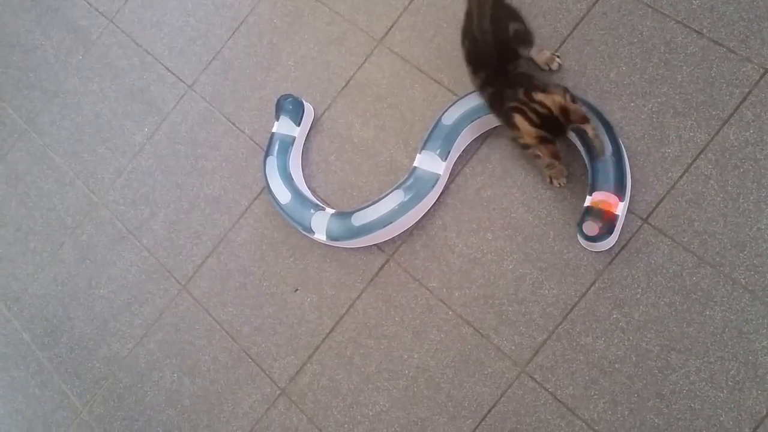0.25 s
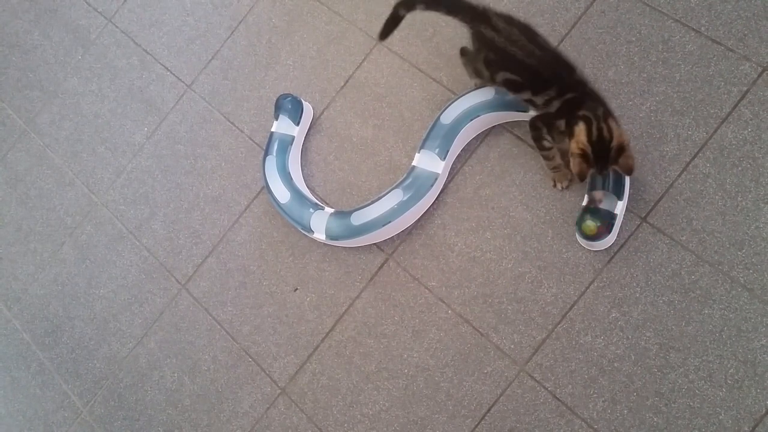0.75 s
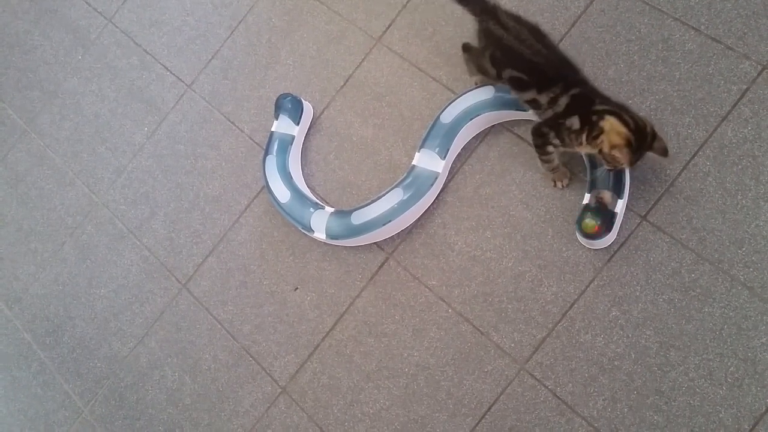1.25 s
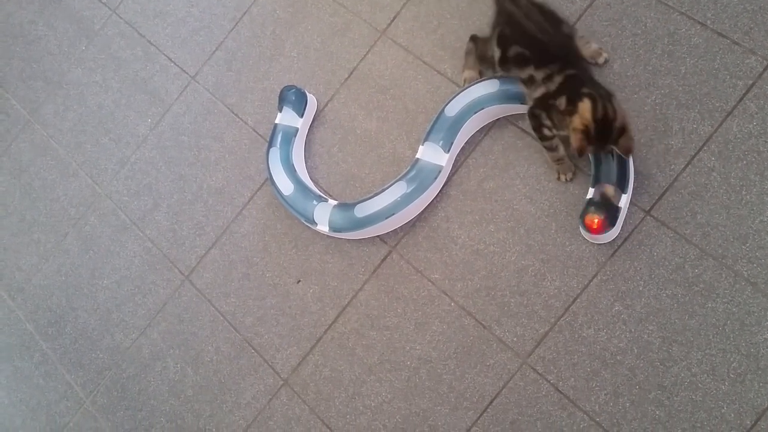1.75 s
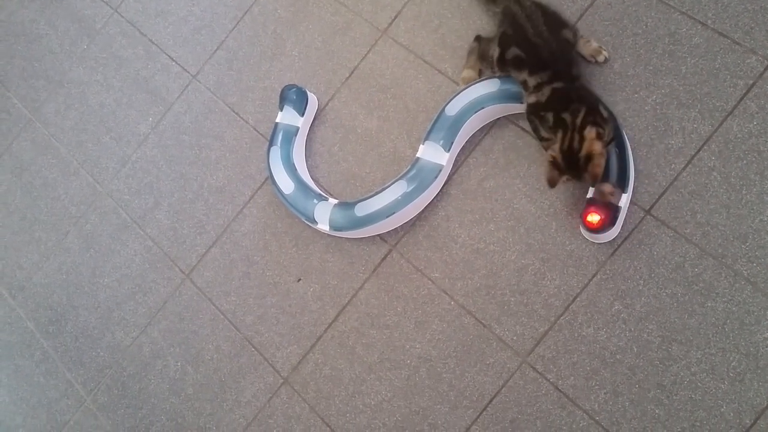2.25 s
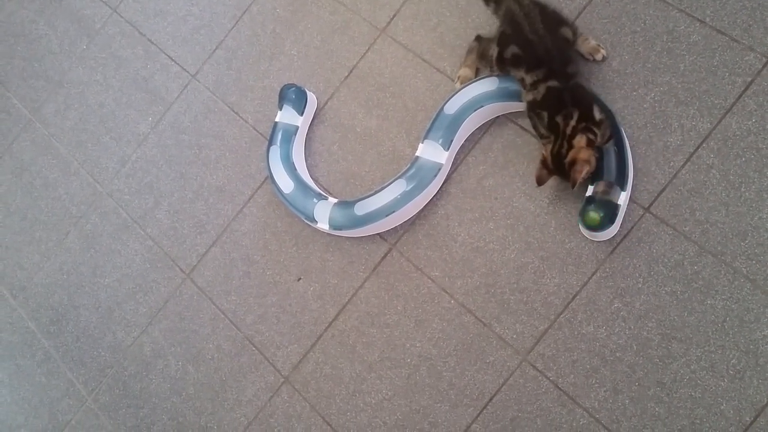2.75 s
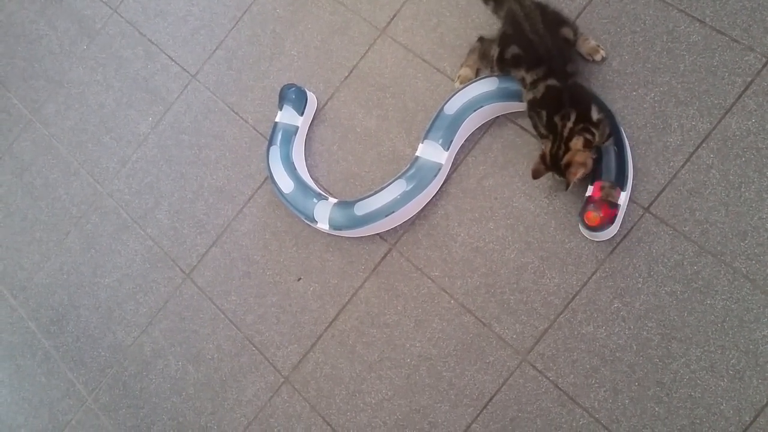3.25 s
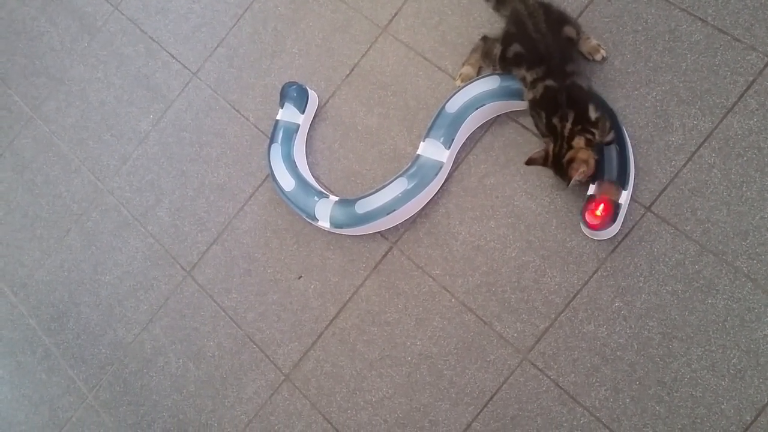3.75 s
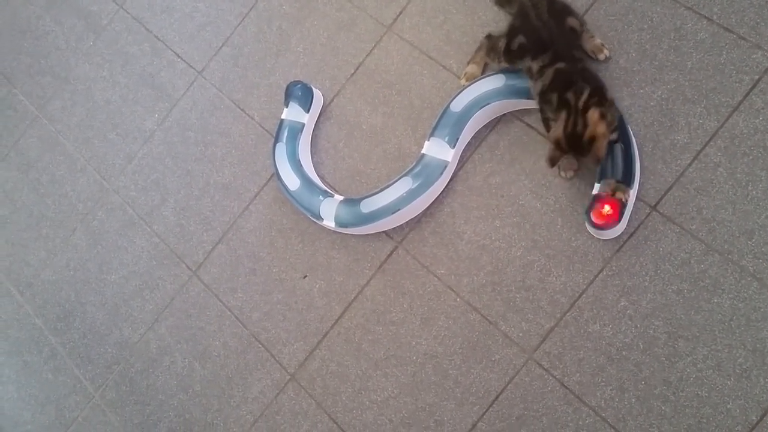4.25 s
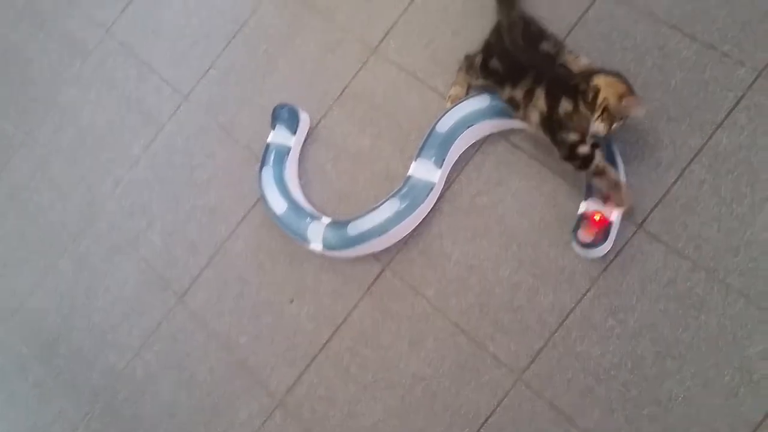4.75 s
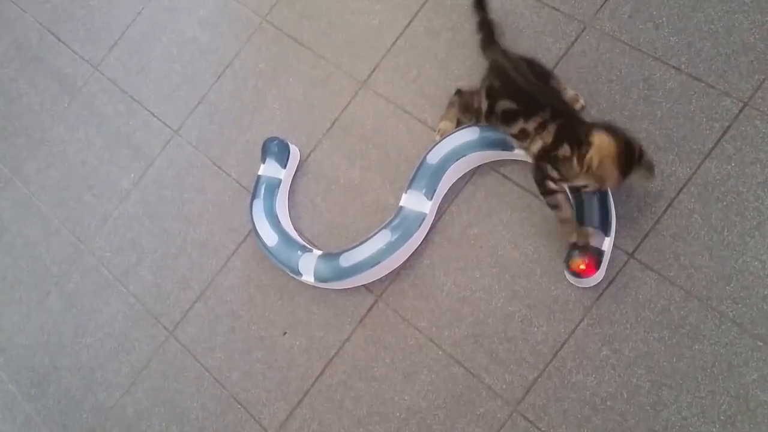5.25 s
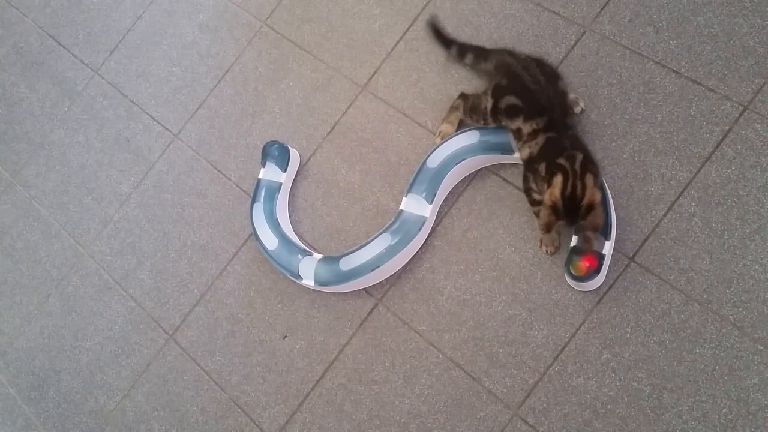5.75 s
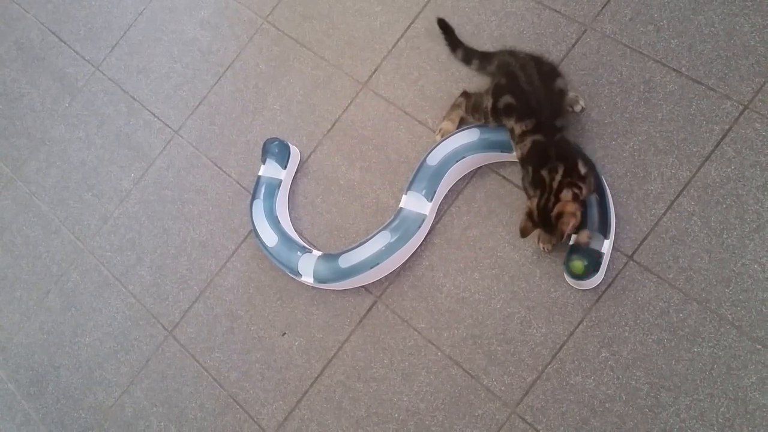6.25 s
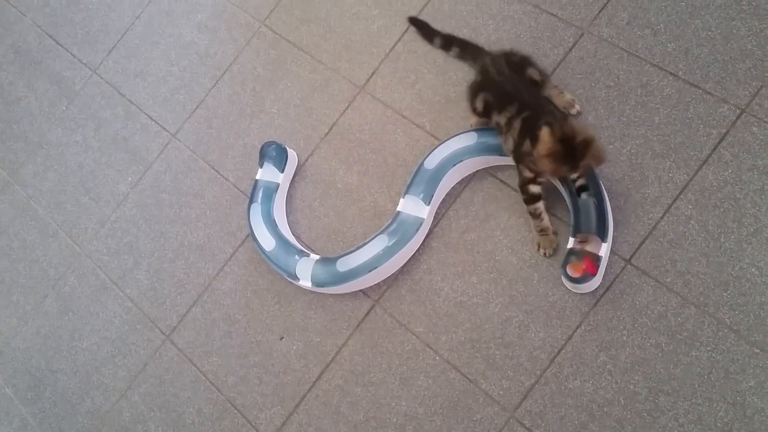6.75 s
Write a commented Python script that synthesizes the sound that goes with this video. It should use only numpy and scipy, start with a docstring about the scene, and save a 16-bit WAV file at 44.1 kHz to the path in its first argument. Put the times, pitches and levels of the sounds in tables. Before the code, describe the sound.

In a bare tiled room with a low, faint appliance hum, a light plastic ball is pawed inside a hollow plastic track, slightly right of centre. Small taps begin at 0.2 s, and sharp loud clacks land at 0.7 and 0.86 s with a flurry of rattles. Knocks and short grainy rolls continue from 1.1 to 2.2 s, with a soft low handling thump near 1.85 s. Lighter, dense rattling fills 2.4 to 3.2 s, ending with one knock at 3.35 s. In the lull, a very thin, high two-tone whistle from the kitten glides from 3.7 to 4.0 s, then a claw ticks and drags faintly on tile. Knocks return at 4.6 s, with another dull handling thump at 4.7 s. Strong clacks strike around 5.0 and 5.4 s, rattling and rolling on to 6.3 s, then sparser taps until a last pair near 6.9 s. Room echo follows each blow; background level sinks in pauses.

```python
"""A light plastic ball knocks and rolls in a hollow plastic track as a kitten paws at it on a tiled floor:
from the start blows and dense small bumps excite damped modes, the bare room rings on after them, and
filtered noise and wavering resonances give the hum of far appliances. At 1.8 s and 4.7 s a hand shifts
on the recorder, a decaying low sine; at 3.7 s the kitten gives one thin two-tone whistle; at 4.0 s a claw
taps and drags on a tile. Throughout, the hand-held stereo recorder turns its gain down in the quiet."""
import sys
import numpy as np
from scipy import signal
from scipy.fft import rfft, irfft, next_fast_len
from scipy.io import wavfile
from scipy.ndimage import uniform_filter1d

SR = 44100
rng = np.random.default_rng(int(sys.argv[2]) if len(sys.argv) > 2 else 0)


def field_ratio(decibels):
    """Amplitude ratio for a level in dB (20 dB per decade); scalars and array-likes work."""
    return 10 ** (np.asarray(decibels, dtype=float) / 20)


def to_wav(s):
    """Save 16-bit WAV."""
    ch = np.atleast_2d(s).T  # columns
    pcm = np.round(np.clip(ch, -1, 1) * 32767)  # PCM
    wavfile.write(sys.argv[1], SR, pcm.astype(np.int16))


N = 309141   # length in samples


def rms_one(x):
    """Normalisation: scale to an rms of 1."""
    return x / np.sqrt(np.mean(x ** 2) + 1e-20)


def in_time(rows):
    """Linear interpolation: the columns of a table led by t/s, sample by sample."""
    s, *columns = np.transpose(rows)
    return [np.interp(np.arange(N) / SR, s, c) for c in columns]


def at_hz(points, hz):
    """Linear interpolation on a log-frequency axis."""
    table_hz, value = np.transpose(points)
    return np.interp(np.log(hz), np.log(table_hz), value)


def drift(rate_hz):
    """Low-passed noise: a slow random fluctuation of rms 1, from two equal real poles at rate_hz."""
    hop = 40   # drawn at every 40th sample
    r = np.exp(-2 * np.pi * hop * rate_hz / SR)
    noise = rng.standard_normal(N // hop + 2002)
    slow = signal.lfilter([1], [1, -2 * r, r * r], noise)[2000:]   # the filter has settled
    return np.interp(np.arange(N) / hop, np.arange(len(slow)), rms_one(slow))


def ring(clicks, hz, t60):
    """Damped resonator: a unit click starts a sine of height 1 that falls 60 dB in t60 seconds."""
    r, w = field_ratio(-60 / (t60 * SR)), 2 * np.pi * hz / SR
    return signal.lfilter([0, np.sin(w)], [1, -2 * r * np.cos(w), r * r], clicks + 1e-18)


def bands(length):
    """Interchannel coherence: half-octave noise, mid and side mixed to left and right by their likeness."""
    # how alike left and right are: f/Hz, likeness (below 0 counts as 0)
    likeness = [(60, 1), (230, 0.75), (910, 0.52), (3550, -0.56), (13800, -0.15)]
    edges = 25 * 2 ** np.arange(0, 9.6, .5)
    white = rng.standard_normal((2, 2, length))   # neighbouring bands take different noise
    for k, (low, high) in enumerate(zip(edges, edges[1:])):
        band_pass = signal.butter(2, [low, high], "band", fs=SR, output="sos")
        mid, side = signal.sosfilt(band_pass, white[k % 2])
        hz = np.sqrt(low * high)
        alike = np.clip(at_hz(likeness, hz), 0, 1)
        yield hz, np.sqrt(1 + alike) * mid + np.sqrt(1 - alike) * side * [[1], [-1]]


def ambience(air_db=-53.5, patchy_db=-0.5):
    """Noise-driven resonance: shaped room noise, and the hum of far appliances wavering in narrow bands."""
    # spectral density of the room noise before it is scaled to air_db: f/Hz, level/dB per Hz
    air_spectrum = [(15, -35), (25, -25), (118, -9.5), (141, -15), (323, -11.5), (386, -13.5), (463, -14),
                    (600, -12), (1770, -24), (2420, -18), (2900, -29), (3470, -30), (5120, -47),
                    (8360, -84), (12000, -56), (15600, -79), (22000, -120)]
    # humming resonances: f/Hz, width/Hz, mid level/dB
    hum = [(47.6, 3.6, -62), (58.3, 12, -60.5), (95.24, 2.4, -63.5), (144, 15.5, -64.5), (195.6, 9.2, -64),
           (396.4, 10, -68), (3510, 340, -65.5)]
    air = sum(field_ratio(at_hz(air_spectrum, hz) + patchy_db * drift(16.0)) * v for hz, v in bands(length=N))
    out = field_ratio(air_db) * rms_one(air)
    for hz, width_hz, level_db in hum:
        t60 = 2.2 / width_hz   # a narrow resonance rings long
        mid = rms_one(ring(rng.standard_normal(N), hz, t60))
        side = rms_one(ring(rng.standard_normal(N), hz, t60))
        out = out + field_ratio(level_db) * (mid + 0.33 * side * np.array([[1], [-1]]))
    return out


def rolling_db(spin_up_s=0.0085, slowing_db_per_s=86):
    """Exponential decay: each roll spins up, runs on, then slows; levels of its rumble and its scuff."""
    # the ball is set rolling: start t/s, rolling on t/s, push level/dB, scuff level over the push/dB
    rolls = [(0, 0.0095, -53.5, -11), (0.211, 0.12, -55, 0), (0.397, 0.014, -57, 15),
             (0.551, 0.35, -46, -5), (.72, 0.043, -43.5, -1.5), (1.08, 0.76, -48.5, -13),
             (1.47, 0.02, -56, 5), (1.72, 0.17, -47, -8.5), (1.999, 0.077, -48.5, 1.5),
             (2.441, 0.32, -49.5, -13), (2.8, 0.27, -46.5, -6), (3.359, 0.076, -59.5, -9),
             (4.66, .15, -55.5, -18), (4.93, 0.11, -43.5, -8), (5.06, 0.027, -41, -2),
             (5.358, 0.15, -45, -8), (5.55, 0.31, -47, -0.5), (6.068, 0.062, -53.5, 3),
             (6.44, 0.19, -45.5, -13), (6.95, .1, -58.5, 3.5)]
    t = np.arange(0, N / SR + .01, .002)
    push, scuff = 1e-6, 1e-6   # floors
    for s, run_s, push_db, scuff_db in rolls:
        slowing_s = np.maximum(t - s - spin_up_s - run_s, 0)
        shape = np.clip((t - s) / spin_up_s, 0, 1) * field_ratio(-slowing_db_per_s * slowing_s)
        push = push + field_ratio(push_db) * shape
        scuff = scuff + field_ratio(push_db + scuff_db) * shape
    return in_time(np.transpose([t, 20 * np.log10(push), 20 * np.log10(scuff)]))


def small(x, hz):
    """Radiation efficiency: a small part radiates little far from its own pitch."""
    wide = 1.32   # band edges as a ratio to the pitch
    edges = [hz / wide, min(hz * wide, .45 * SR)]
    return signal.sosfilt(signal.butter(1, edges, "band", fs=SR, output="sos"), x)


def track(per_s=70.0, spread_db=2.5, wander_db=3.0, mode_spread_db=1.5):
    """Modal excitation: knocks and the dense small bumps of the rolling ball strike the same modes."""
    # blows of ball and paw: t/s, blow level/dB, then hollow, wall and hardness level over the blow/dB
    knocks = [(0.1965, -47.5, 2, -19, -36), (0.2831, -43, -31, -16, -11), (0.2945, -34, -25, -9.5, -17.5),
              (0.4403, -32, -22, -26, -9), (0.5488, -38.5, -13, 2, -5), (0.7124, -20.5, -10, -7.5, -14.5),
              (0.8001, -31, -6, -9, -3.5), (0.8637, -21, -9.5, -1.5, -7.5), (0.889, -37, -1, -8, -15),
              (0.917, -34, -7, -5, -10), (0.932, -30.5, -1.5, -15, -10), (0.957, -36.5, -10, -6, -19),
              (0.976, -41, -8, -6, -24), (1.147, -29.5, -10.5, -1.5, -13.5), (1.1783, -28.5, -5.5, 2, -6.5),
              (1.3935, -32.5, -4.5, -2.5, -18.5), (1.4264, -36, 0, -5, -21), (1.447, -29, -20, -7, -13),
              (1.6771, -35, -49, -1.5, -49), (1.6983, -39, -1, -5, -8.5), (1.765, -27.5, -25, -1.5, -21),
              (1.8054, -37, 2.5, 5, -0.5), (1.9662, -29, -3.5, 3.5, -12.5), (2.0854, -35, -5, -14, -13),
              (2.1013, -36, 0, -1, -18), (2.1256, -38.5, -9, -8, -16), (2.136, -41, 0, -8, -22),
              (2.175, -27.5, -7, -3, -9.5), (2.3962, -37.5, -17, -2, -14.5), (2.484, -38.5, -18, -2, -6.5),
              (2.6413, -38.5, -1, -2, -20), (2.665, -34, -3.5, -6.5, -25), (2.6892, -40.5, -1, -9, -16),
              (2.7733, -33, -6, -5, -17), (2.8106, -33.5, -3, -7, -30), (2.841, -39, -13, -0.5, -20),
              (2.871, -38, -4, 1.5, -12), (2.886, -41, -10, 2, -12), (2.9125, -34, -1.5, -4, -59),
              (2.998, -39.5, -2, -6, -17), (3.016, -38.5, -5, -4, -13), (3.1044, -33.5, -26, -2, -14),
              (3.1858, -36.5, -0.5, -6, -13.5), (3.3453, -30, -3.5, -5.5, -21.5),
              (4.6311, -36, -20, -13.5, -20), (4.738, -34.5, -11, -8, -20), (4.8368, -39, -24, -15, -33),
              (4.8522, -31.5, -13.5, -11.5, -26), (4.9067, -41, -2, 8, -10), (4.9271, -32, -34, 0.5, -11),
              (4.998, -41, -12, -2, -11), (5.0077, -24.5, -20, -4.5, -12), (5.0685, -22, -17, -21, -38),
              (5.1451, -31.5, -3, 1, -7), (5.3201, -27.5, -19, -4.5, -15), (5.3431, -31, -14, -13, -25),
              (5.3596, -34, -3, -13, -21), (5.4117, -26, -10, -10, -20), (5.4304, -23.5, -6.5, -3.5, -12.5),
              (5.461, -31.5, -4, -5, -13), (5.469, -37, -3, -15, -17), (5.5871, -32.5, 0, -16, -19),
              (5.6331, -31, -6, 0.5, -12), (5.654, -26.5, -3.5, -2.5, -5), (5.666, -33, -1, -5, -6.5),
              (5.692, -37, -12, -7, -5), (5.7978, -30, -5, -0.5, -14), (5.8892, -28.5, -2.5, -1, -8),
              (5.9097, -32, -3.5, -19, -7), (6.117, -31, 0, -1.5, -17), (6.1429, -28.5, -8, -9.5, -24),
              (6.2893, -26, -3, -2, -10), (6.5025, -40, -5, -19, -31), (6.5413, -40, -4, -1.5, -32),
              (6.68, -45, -8, -1, -9), (6.709, -46, -12, 4, -1.5), (6.8212, -28, -7, -2.5, -18),
              (6.8885, -36, -6, -14, -19), (6.8945, -30.5, -7, -10, -20)]
    # modes of track and ball, part by part: f/Hz, level/dB, t60/s
    hollow = [(388, -10.5, 0.019), (489, -10, 0.011), (796, 1, 0.014)]
    body = [(962, -3, 0.021), (1062, -1, 0.02), (1159, -1.5, 0.018), (1245, 0.5, 0.02), (1387, 4.5, 0.01)]
    wall = [(1648, 1.5, 0.019), (1920, -1, 0.016), (2173, 0, 0.015), (2289, 1.5, 0.015), (2485, 0, .014),
            (2592, -1, 0.017)]
    rim = [(2900, 9.2, 0.0034), (3445, 1.5, 0.012), (3856, 2.65, 0.0057)]
    tick = [(4930, 4, 0.0011), (5670, -2.5, 0.0048), (6000, -4, 0.0035), (7330, 2.5, 0.0018),
            (9350, -1.5, 0.0022), (10140, -8.5, 0.0059), (12520, -3.5, 0.0014)]
    # where the ball lies decides which modes it favours: t/s, body f/Hz, wall f/Hz
    favoured = [(0.2, 1050, 2010), (0.37, 1165, 1980), (0.48, 1050, 2200), (0.62, 1170, 1920),
                (0.75, 1036, 2340), (0.86, 1160, 2090), (1.22, 1050, 2200), (1.33, 963, 1990),
                (1.39, 1145, 2170), (1.72, 1080, 2070), (1.75, 1197, 2150), (1.96, 1124, 2260),
                (2.34, 1120, 1960), (2.4, 1150, 2240), (2.62, 1104, 2200), (3.04, 1040, 2130),
                (3.1, 1195, 2240), (3.36, 1040, 2200), (3.89, 993, 2150), (4.01, 1070, 2130),
                (4.29, 1010, 2350), (4.37, 1040, 2060), (4.57, 1030, 2240), (4.63, 1105, 1960),
                (4.78, 1040, 2160), (4.99, 1170, 2110), (5.12, 1110, 1840), (5.16, 1270, 2220),
                (5.28, 1070, 2100), (5.31, 1196, 2170), (5.52, 954, 2200), (5.65, 1140, 2250),
                (6.66, 1040, 2130), (6.73, 1200, 2280), (6.81, 1070, 2350), (7.0, 1100, 2040)]
    body_hz, wall_hz = in_time(favoured)
    knock_s, blow_db, hollow_db, wall_db, hard_db = np.transpose(knocks)
    at = np.round(knock_s * SR).astype(int)

    rumble_db, scuff_db = rolling_db()
    wall_roll_db = rumble_db + 0.61 * (scuff_db - rumble_db)   # the wall follows the scuff in part
    born = rng.random(N) < per_s * field_ratio(2.5 * drift(15.0)) / SR
    heights = field_ratio(spread_db * np.minimum(rng.exponential(1, N), 3))
    bumps = rms_one(born * heights * rng.choice([-1, 1], N))

    # modes, knock level/dB, rolling level/dB, favoured f/Hz, octaves off it for 6 dB less
    parts = [(hollow, hollow_db - 1.5, rumble_db - 30, None, None),
             (body, -2.5, rumble_db - 30.5, body_hz, 0.3),
             (wall, wall_db + 0.1, wall_roll_db - 25.5, wall_hz, 0.34),
             (rim, 0.98 * hard_db - 3.0, wall_roll_db - 36, None, None),
             (tick, hard_db + 0.45, scuff_db - 29.5, None, None)]
    out, sign = np.zeros(N), 1
    for modes, knock_db, roll_db, centre_hz, reach in parts:
        rolling = bumps * field_ratio(roll_db)
        for hz, level_db, t60 in modes:
            clicks = rolling * field_ratio(wander_db * drift(7.2))   # the ball moves on, the colour wanders
            chance_db = mode_spread_db * rng.standard_normal(len(at))   # each blow lands elsewhere
            clicks[at] += field_ratio(blow_db + knock_db + chance_db)
            if centre_hz is not None:
                clicks *= field_ratio(-6 * (np.log2(hz / centre_hz) / reach) ** 2)
            out += field_ratio(level_db) * sign * small(ring(clicks, hz, t60), hz)
            sign = -sign   # successive modes alternate in polarity
    return out


def room(x, tail_db=-27.0, build_s=0.0062, cover_hz=2960.0, direct_db=6.5):
    """Convolution with a room response: direct sound and first echoes, then a tail dying band by band."""
    # reverberation time: f/Hz, t60/s
    room_t60 = [(150, 0.89), (800, 0.77), (2200, 0.73), (5000, 0.82), (12000, 0.31)]
    # first reflections off tiles and walls: delay t/s, left level/dB, right level/dB
    echoes = [(.0035, 3.5, 2), (.0095, -5, -2.5), (.017, -22, -4), (.022, 2, -11), (.030, -1.5, -6.5),
              (.040, -16, 0), (.051, 0, -13)]
    # channel balance: f/Hz, left over right level/dB
    left_over_right = [(100, -13), (500, -1), (1200, -2.5), (2400, -6.5), (5000, -1), (12000, -4)]
    t = np.arange(SR) / SR
    tail = sum(v * field_ratio(-60 * t / at_hz(room_t60, hz)) for hz, v in bands(length=SR))
    early = np.zeros((2, SR))
    early[1, 0] = early[0, 8] = field_ratio(direct_db)   # the track lies to the right: the left port hears it later
    for k, (s, left_db, right_db) in enumerate(echoes):
        shift = 6 * (-1) ** k   # samples; echoes come from either side by turns
        early[0, round(s * SR) + shift] += field_ratio(left_db)
        early[1, round(s * SR) - shift] += field_ratio(right_db)
    # the track's cover dulls the direct sound and first echoes
    early = signal.sosfilt(signal.butter(1, cover_hz, fs=SR, output="sos"), early)
    reply = early + field_ratio(tail_db) * tail * (1 - np.exp(-t / build_s))
    size = next_fast_len(N + SR)
    hz = np.arange(1, size // 2 + 2) * SR / size
    lean = field_ratio(at_hz(left_over_right, hz) / 2 * [[1], [-1]])
    return irfft(rfft(x, size) * rfft(reply, size) * lean, size)[:, :N]


def thumps():
    """Impulse response of a damped resonator: soft low pushes as the hand shifts on the recorder's case."""
    # pushes: t/s, f/Hz, level/dB
    pushes = [(1.849, 46.3, -46), (1.874, 149, -34), (4.715, 127, -37)]
    out = np.zeros(N)
    for s, hz, level_db in pushes:
        push = np.zeros(N)
        push[round(s * SR)] = field_ratio(level_db)
        out += ring(push, hz, 5.0 / hz)   # 60 dB down in five periods
    return out


def whistle(lower_db=-14.0):
    """Frequency modulation: two sines glide together, a little less than a fifth apart."""
    # upper tone, two arches: t/s, f/Hz, level/dB
    glide = [(3.716, 11950, -88), (3.73, 11800, -68), (3.76, 12150, -63), (3.785, 12200, -62),
             (3.803, 11900, -65), (3.82, 12250, -62), (3.845, 12400, -61), (3.875, 12150, -61),
             (3.905, 11900, -65), (3.945, 11700, -72), (3.99, 12150, -86), (4.015, 12000, -100)]
    hz, level_db = in_time(glide)
    t = np.arange(N) / SR
    gate = (t > glide[0][0]) & (t < glide[-1][0])
    phase = 2 * np.pi * np.cumsum(hz * (1 + .002 * drift(68.0))) / SR
    return gate * field_ratio(level_db) * (np.sin(phase) + field_ratio(lower_db) * np.sin(phase * .682))


def claw(start_s=4.031, tap_db=-55, catch_db=-68, fade_s=0.087, per_s=900.0):
    """Stick-slip excitation: a tap and a fading run of tiny catches set the tile's modes ringing."""
    # modes of the tile: f/Hz, level/dB, t60/s
    tile = [(3380, 10, 0.008), (3930, 9, 0.0088), (4650, -1, 0.01), (5700, -13, 0.007), (6650, -9, .008),
            (7650, -19, .005)]
    t = np.arange(N) / SR - start_s
    catches = (rng.random(N) < per_s / SR) * rng.standard_normal(N)
    catches *= (t > 0) * field_ratio(catch_db) * np.exp(-np.maximum(t, 0) / fade_s)
    catches[round(start_s * SR)] = field_ratio(tap_db)
    return sum(field_ratio(level_db) * ring(catches, hz, t60) for hz, level_db, t60 in tile)


def scene():
    """Superposition: track and kitten in the room, ambience and handling beside them."""
    thin = whistle()
    in_room = room(track() + claw() + field_ratio(-9.0) * thin)
    return in_room + thin + ambience() + thumps()


def roll_off(x):
    """The treble ends steeply here."""
    return signal.sosfilt(signal.butter(12, 14440, fs=SR, output="sos"), x)


def record(dry, open_db=-40.5, knee_db=15.5, depth_db=10.0, fall_db_s=23.5):
    """Downward expansion: the gain opens at once on sound above 500 Hz and sinks slowly in the quiet."""
    high_pass = signal.butter(2, 500, "high", fs=SR, output="sos")
    upper = signal.sosfilt(high_pass, dry.mean(axis=0))
    level_db = 10 * np.log10(uniform_filter1d(upper ** 2, size=400) + 1e-12)
    want_db = depth_db * np.clip((level_db - open_db) / knee_db, -1, 0)
    slope = fall_db_s * np.arange(N) / SR
    held_db = np.maximum.accumulate(want_db + slope) - slope   # falls no faster than fall_db_s
    gain_db = uniform_filter1d(np.maximum(held_db, -depth_db), size=300)
    low_pass = signal.cheby2(10, 60, 14600, fs=SR, output="sos")   # 60 dB down from 14.6 kHz
    mix = signal.sosfilt(low_pass, dry) * field_ratio(gain_db)
    return roll_off(mix)


dry = scene()
out = record(dry)
to_wav(out)
```